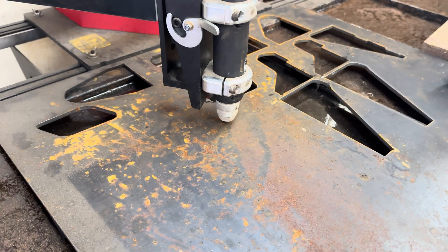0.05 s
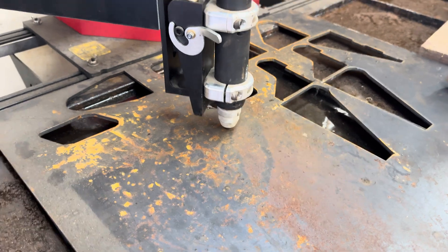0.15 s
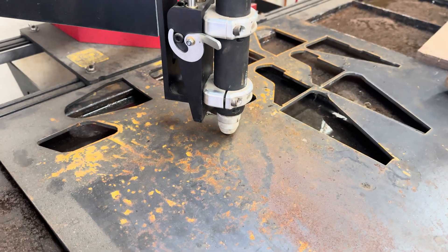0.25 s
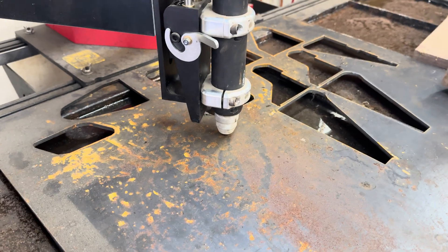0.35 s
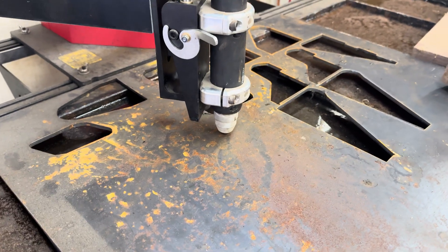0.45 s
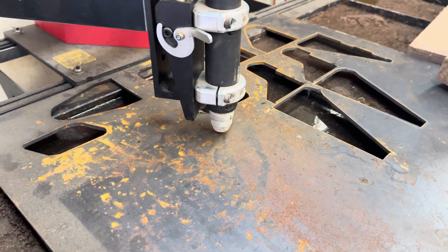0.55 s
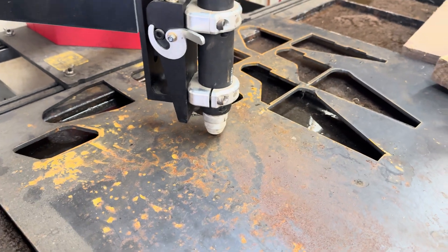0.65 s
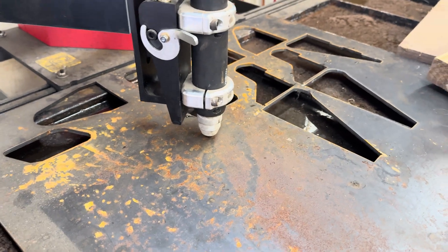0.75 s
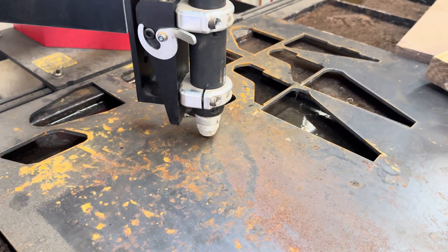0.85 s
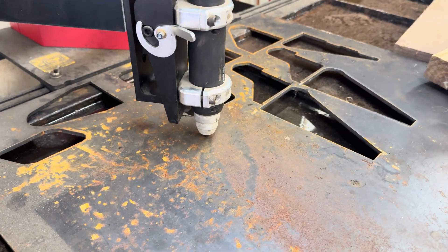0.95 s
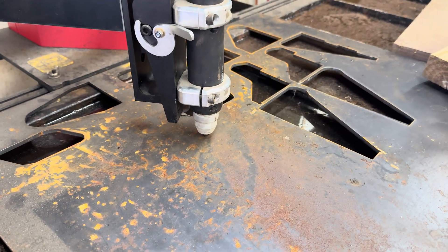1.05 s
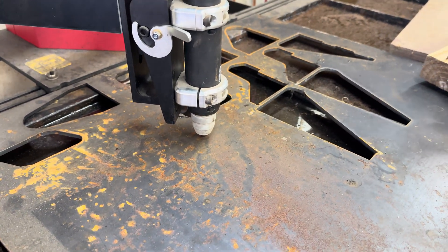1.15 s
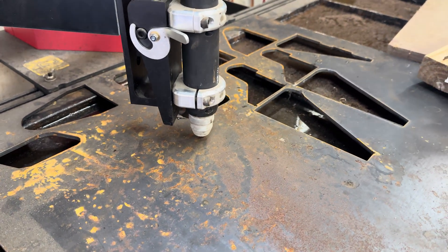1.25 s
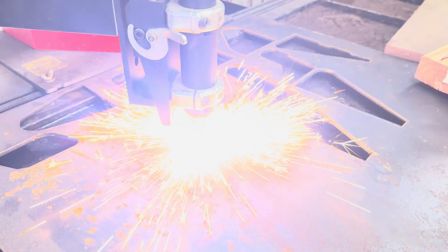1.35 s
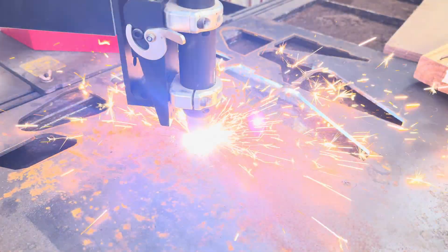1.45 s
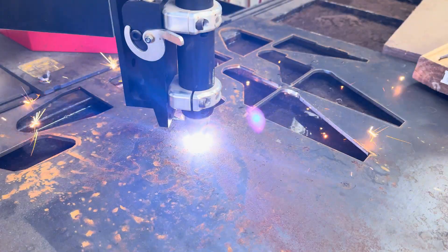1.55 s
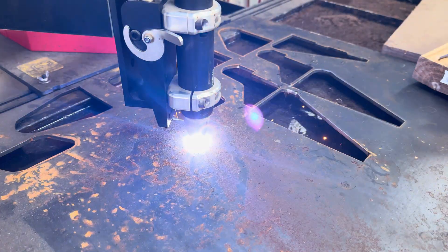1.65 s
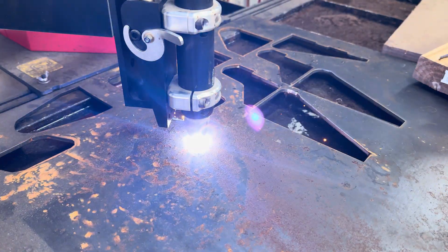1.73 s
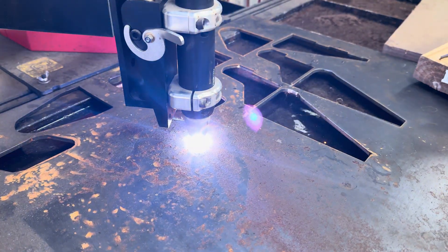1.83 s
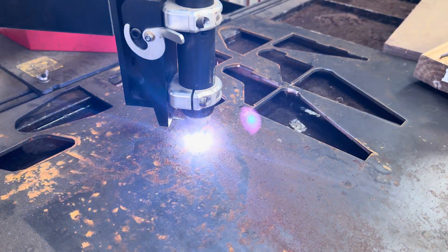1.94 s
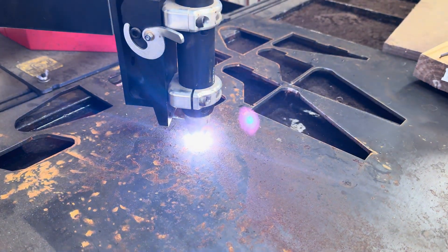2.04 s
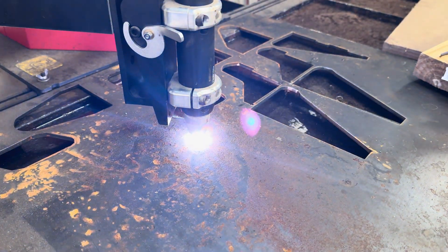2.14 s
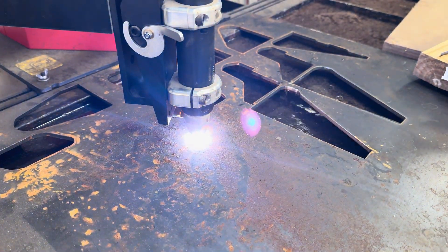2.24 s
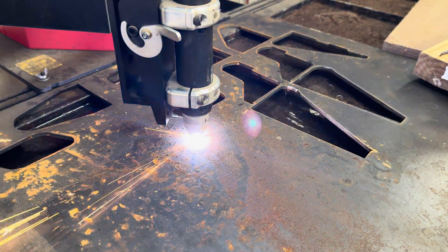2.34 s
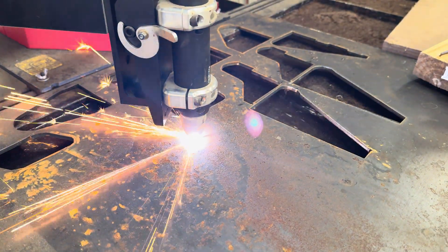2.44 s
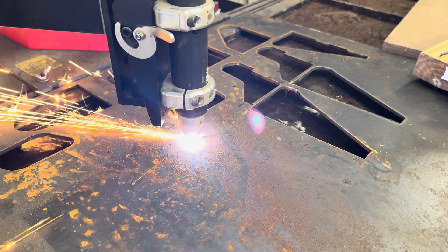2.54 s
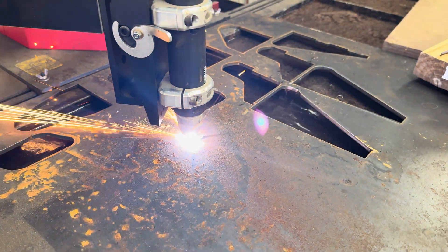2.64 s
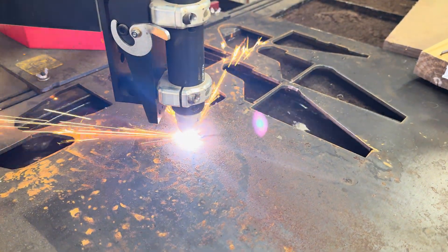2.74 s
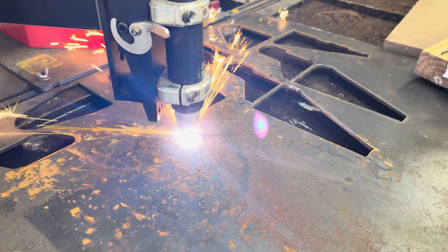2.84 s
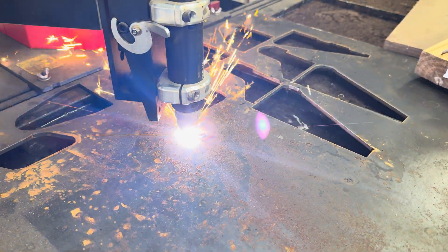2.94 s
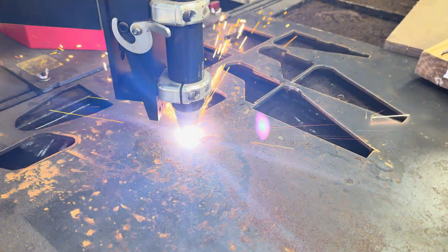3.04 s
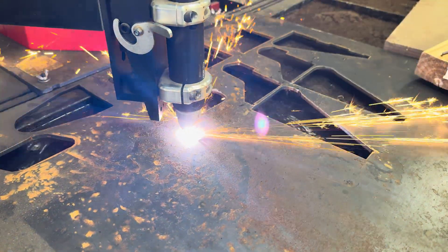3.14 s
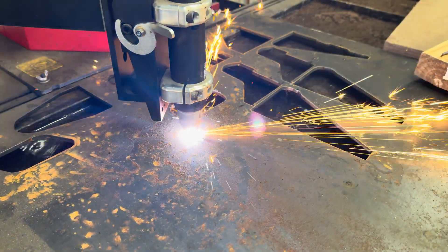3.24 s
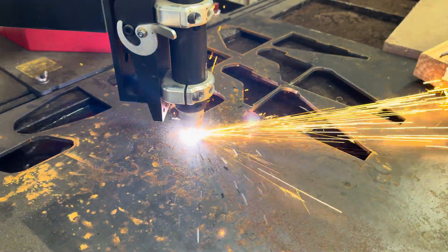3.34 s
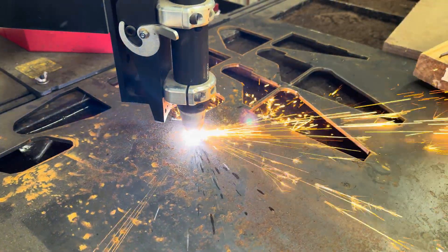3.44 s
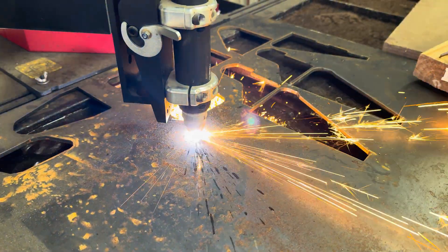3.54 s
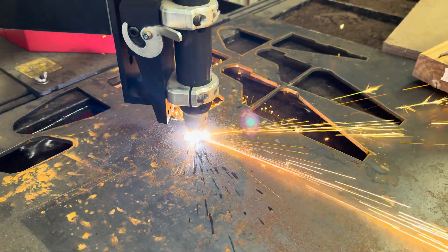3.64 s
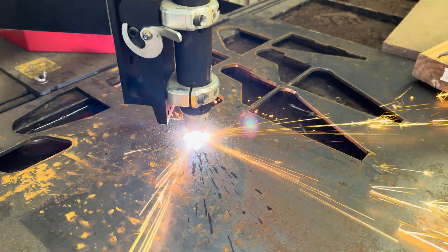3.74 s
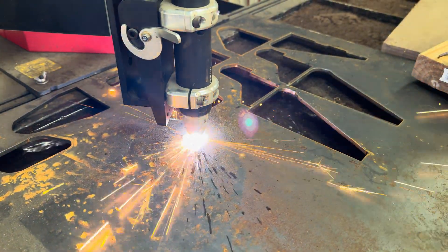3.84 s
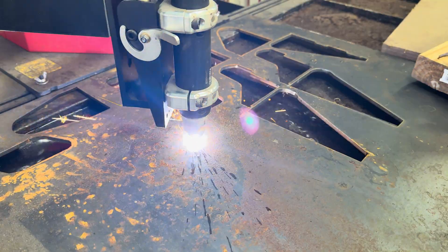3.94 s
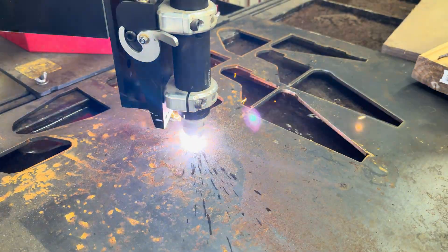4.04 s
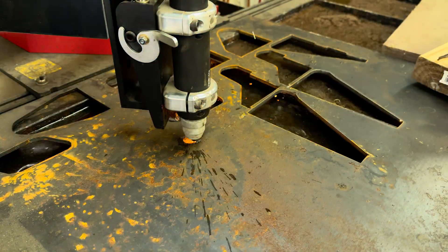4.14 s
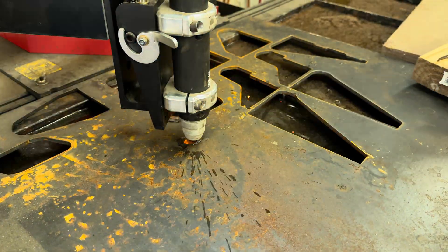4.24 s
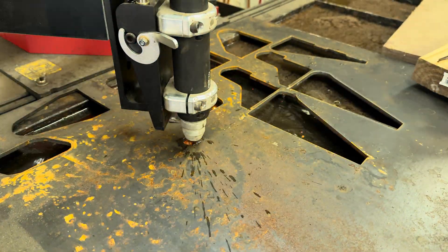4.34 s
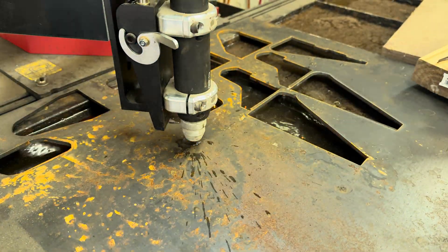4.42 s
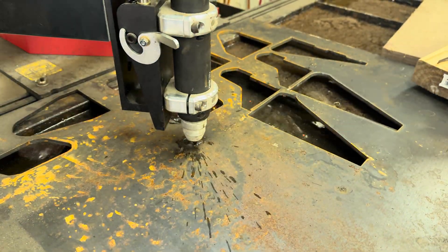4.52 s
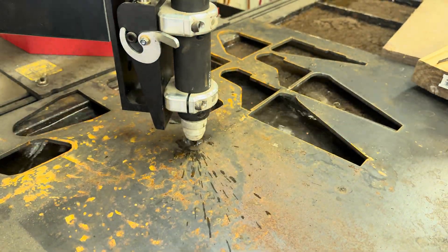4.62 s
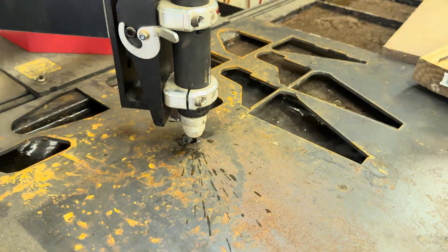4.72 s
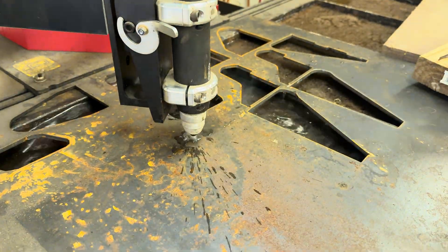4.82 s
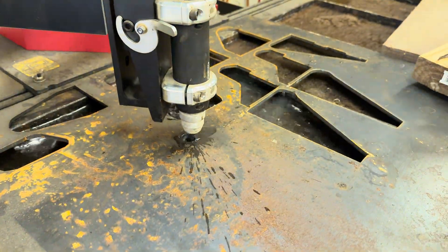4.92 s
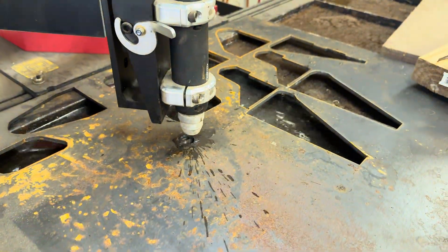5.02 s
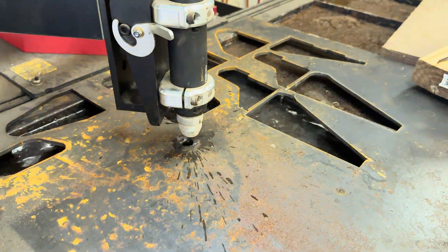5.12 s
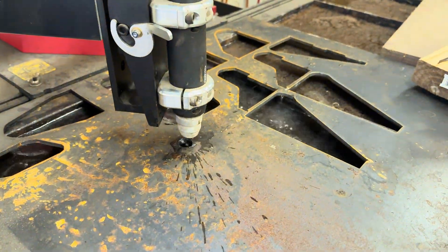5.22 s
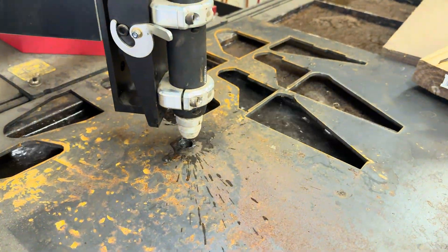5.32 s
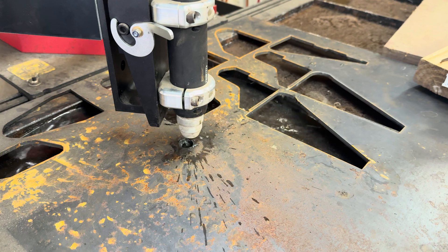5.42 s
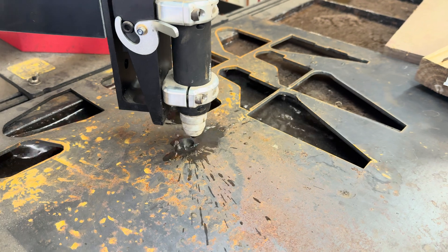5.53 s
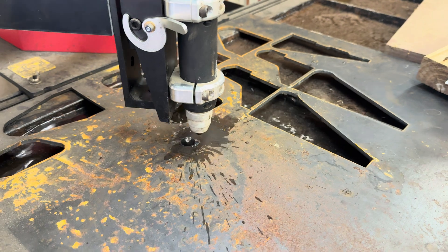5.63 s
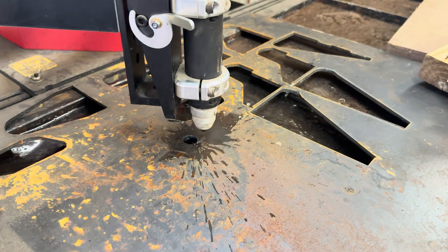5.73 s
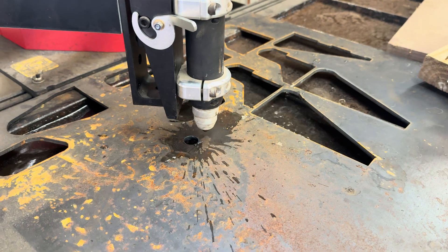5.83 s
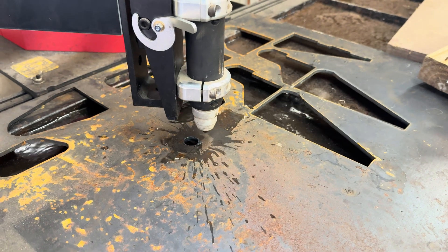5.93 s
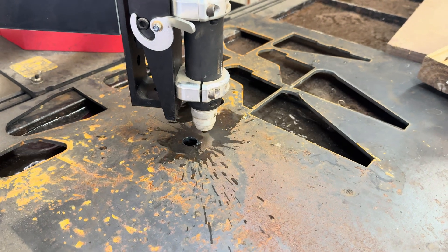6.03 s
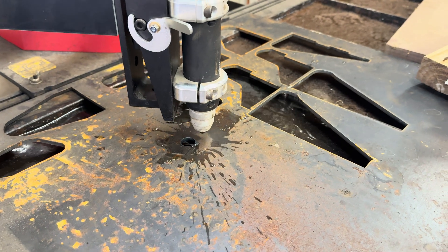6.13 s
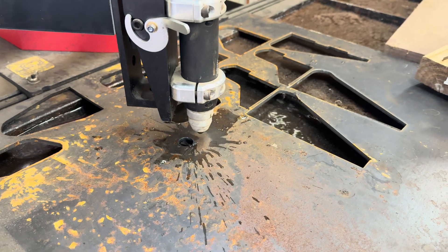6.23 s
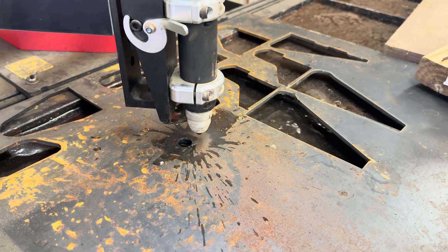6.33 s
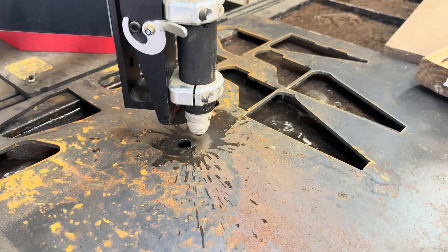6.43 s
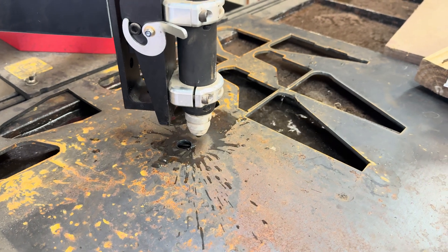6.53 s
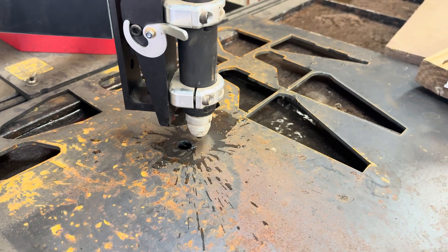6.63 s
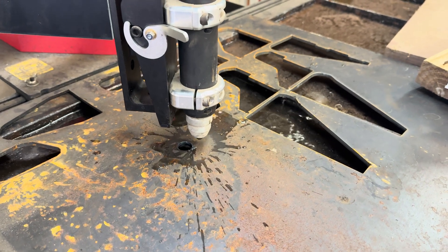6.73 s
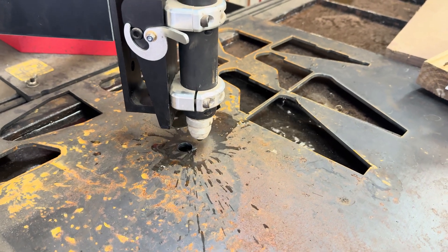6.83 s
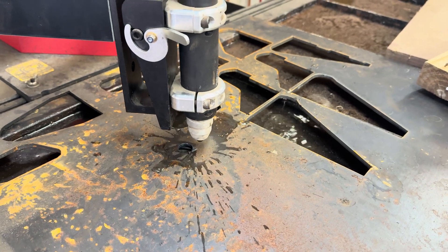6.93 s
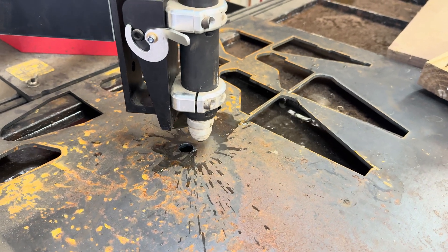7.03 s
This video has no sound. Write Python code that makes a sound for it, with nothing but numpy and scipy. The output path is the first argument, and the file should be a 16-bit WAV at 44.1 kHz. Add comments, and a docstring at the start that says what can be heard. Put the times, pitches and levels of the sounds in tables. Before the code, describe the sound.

Close to a cutting table, fans and a compressor hum beneath a faint leak and a bright click. Air whistles briefly before an arc bursts into loud, throbbing gas roar, splattering and sizzling in irregular pulses for almost three seconds. A hard snap stops it. High nozzle hiss remains, with hollow breathy singing over the hole and watery plops, then eases to a gentler hiss.

```python
"""Workshop hum, a few valve clicks, a rush of air, then a throbbing roar that snaps off with a pop into hiss.
A plasma torch pierces a steel plate on a water table: coloured noise in five gas regions, lifted by gushes.
Clicks and snap are decaying noise bursts; pops, slugs and bubbles gliding sines; spatter filtered impulses.
After the arc, cooling air churns the water; hole and cut slots sing as narrow-band noise."""
import sys
import numpy as np
from scipy import signal
from scipy.fft import rfft, irfft, next_fast_len
from scipy.io import wavfile
from scipy.ndimage import map_coordinates

SR = 44100
rng = np.random.default_rng(int(sys.argv[2]) if len(sys.argv) > 2 else 0)


def file_out(sig):
    """Save sig as 16-bit WAV at sys.argv[1]."""
    # one column per channel
    cols = np.atleast_2d(sig).T
    # limit, then scale
    lim = np.clip(cols, -1, 1)
    pcm = np.round(lim * 32767).astype(np.int16)
    wavfile.write(sys.argv[1], SR, pcm)


N = 311787
HZ = np.maximum(np.fft.rfftfreq(next_fast_len(N), 1 / SR), 1)   # FFT bins, DC moved to 1 Hz for the log
# air flows, arc strikes, arc breaks, air pressure eases
AIR_ON_S, STRIKE_S, BREAK_S, EASE_S = 1.314, 1.382, 4.135, 5.6


def amp(db):
    """dB to amplitude factor."""
    return 10 ** (np.asarray(db) / 20)


def rms_one(x):
    """Scale to unit rms over all channels."""
    return x / np.sqrt(np.mean(x ** 2) + 1e-20)


def in_time(rows):
    """Interpolate each column after t/s to every sample."""
    s, *columns = np.transpose(rows)
    return [np.interp(np.arange(N) / SR, s, c) for c in columns]


def at_hz(points):
    """Interpolate (f/Hz, value) to the FFT bins over log frequency."""
    hz, values = np.array(points).T
    return np.interp(np.log(HZ), np.log(hz), values)


def peak(hz, width_hz):
    """Resonance curve over the FFT bins, 1 at its centre and half at +-width/2."""
    return 1 / (1 + (2 * (HZ - hz) / width_hz) ** 2)


def noise(gain):
    """Two unrelated Gaussian noises shaped by gain per frequency; joint rms 1."""
    real, imaginary = rng.standard_normal((2, 2, len(HZ)), dtype=np.float32)
    spectrum = (real + 1j * imaginary) * np.float32(gain)
    return rms_one(irfft(spectrum, next_fast_len(N))[:, :N])


def drift(rate_hz):
    """Slow random wander of rms 1: two-pole low-passed noise at every 32nd sample."""
    r = np.exp(-64 * np.pi * rate_hz / SR)
    draws = rng.standard_normal(N // 32 + 2002)
    slow = signal.lfilter([1], [1, -2 * r, r * r], draws)[2000:]   # drop the settling
    return np.interp(np.arange(N) / 32, np.arange(len(slow)), rms_one(slow))


def since(s):
    """Seconds elapsed since s, 0 before it."""
    return np.maximum(np.arange(N) / SR - s, 0)


def decay(age_s, t60_s, rise_s):
    """Exponential rise times a 60 dB fall per t60."""
    return (1 - np.exp(-age_s / rise_s)) * amp(-60 * age_s / t60_s)


def glide(s, db, hz, t60_s, rise_s=0.0013, slide=1):
    """Dying sine whose pitch slides by a factor over one t60."""
    out, start = np.zeros(N), round(s * SR)
    age_s = np.arange(min(round(1.5 * t60_s * SR), N - start)) / SR
    pitch_hz = hz * slide ** np.minimum(age_s / t60_s, 1)
    sine = np.sin(2 * np.pi * np.cumsum(pitch_hz) / SR)
    out[start:start + len(age_s)] = amp(db) * decay(age_s, t60_s, rise_s) * sine
    return out


def hum():
    """Fan and compressor hum: broad rush, narrow casing resonances and wavering motor tones."""
    # hum level, before a common offset: t/s, level/dB
    hum_level = [(0.0, -33.5), (1.38, -33.5), (1.61, -41.5), (2.32, -49.5), (3.19, -47), (4.15, -51),
                 (4.45, -58), (5.44, -55), (7.07, -53)]
    # rush spectrum: f/Hz, relative level/dB
    rush_colour = [(18, -63), (30, -22), (65, -13), (97, -19), (130, -12.5), (160, -4), (304, -11.5),
                   (470, -20), (624, -16), (674, -20), (917, -17), (1040, -22.5), (1460, -19.5),
                   (2990, -37.5), (9280, -47), (11100, -50), (14000, -56)]
    # casing resonances: f/Hz, width/Hz, relative level/dB
    casing_tones = [(163, 20, -13), (192.3, 5.4, -12.5), (213.3, 9.2, -12), (274, 8.1, -15),
                    (307.8, 14, -12.5), (364, 8.7, -16.5), (420, 20, -19.5), (506, 20, -26.5),
                    (560, 10, -29), (800, 22, -27), (615, 34, -15.5), (907, 24, -22), (1310, 13, -21)]
    # motor tones: f/Hz, mean level against the hum/dB
    motor_lines = [(165, -14), (274.3, -15), (303, -17)]
    # diffuse sound from all round, second channel over first: f/Hz, level/dB
    spread = [(60, -3), (200, 4), (380, 11.5), (700, -1), (1300, 1.5), (3000, 4)]
    waver_db, waver_rate_hz = 2.5, 2.8
    rush_power = amp(at_hz(rush_colour)) ** 2
    tone_power = sum(amp(db + 11.5) ** 2 * peak(hz, width) ** 2 for hz, width, db in casing_tones)
    motors = np.zeros(N)
    for hz, db in motor_lines:
        motors += amp(db + waver_db * drift(waver_rate_hz)) * np.sin(2 * np.pi * hz * since(0))
    fans = noise(np.sqrt(rush_power + tone_power) * amp(at_hz(spread) * [[0], [1]]))
    level_db = in_time(hum_level)[0] + 5.5 + 0.29 * drift(1.2)
    return amp(level_db) * (fans + motors)


def clicks_and_leak():
    """Short ringing noise bursts: valve clicks, and the snap as the arc breaks; a distant leak dies away."""
    # valve clicks, last row the arc's snap: t/s, level/dB, t60/s
    click_rows = [(0.3077, -41, 0.019), (0.4163, -25, 0.024), (.432, -37, .025), (0.6944, -52, 0.026),
                  (1.2805, -44, 0.33), (4.1315, -17, 0.01)]
    # resonances of the bursts, as of a valve body: f/Hz, width/Hz, lift/dB
    burst_ring = [(1400, 300, 10), (4060, 180, 10), (5200, 170, 8), (6900, 320, 11), (10300, 670, 5),
                  (12000, 3500, 6)]
    # distant air leak: t/s, level/dB
    leak_level = [(0, -50), (.06, -38), (.14, -39), (.22, -51), (.4, -58), (.5, -100)]
    ring_db = sum(db * peak(hz, width) for hz, width, db in burst_ring)
    ringing_noise = noise(amp(ring_db) * HZ / (HZ + 2000))
    bursts = np.zeros(N)
    for s, db, t60_s in click_rows:
        start = round(s * SR)
        age_s = np.arange(min(SR, N - start)) / SR
        tail = 0.24 * decay(age_s, 6.9 * t60_s, 0.0019)
        bursts[start:start + len(age_s)] += amp(db) * (decay(age_s, t60_s, 0.00068) + tail)
    leak_colour_db = at_hz([(800, 5.0), (2000, 1.0), (9000, -13.5), (15000, -17)])
    return ringing_noise * bursts + amp(in_time(leak_level)[0]) * noise(amp(leak_colour_db))


def valve_pings():
    """The plunger seats: brief steady-pitch dying sines."""
    # pings: t/s, level/dB, f/Hz, t60/s
    ping_rows = [(.4192, -24, 4100, .03), (0.4205, -30, 5350, .025)]
    return sum(glide(*row, slide=1) for row in ping_rows) * [[1], [.5]]


def gas_levels():
    """Level/dB of each gas region: air alone, arc, cooling air, eased air; gushes and sloshes on top."""
    # Lists hold one value per region: deep roar, hollow roar, splatter, sizzle, nozzle hiss.
    # air alone: start level/dB; slope/(dB/s) as the first rush settles
    preflow_db = [-43, -28, -31.5, -34.5, -29]
    preflow_slope = [0.1, -150, -150, -3, 0.1]
    # arc between gushes: level/dB at strike (deep roar: added to deep_level); slope/(dB/s)
    arc_db = [-0.13, -33, -38.5, -36, -24.5]
    arc_slope = [-0.2, -2, -5.5, -3, -0.28]
    # deep roar swells while piercing, fades once through, returns at the end: t/s, level/dB
    deep_level = [(1.4, -32.5), (1.6, -33.5), (2.1, -27.5), (2.45, -28), (2.9, -39.5), (3.6, -51.5),
                  (4.12, -30)]
    # fall/s as the arc breaks: low sound lingers in the workshop
    break_fall_s = [0.089, 0.14, 0.038, .012, 0.005]
    # cooling air: level/dB at the break; slope/(dB/s) until the pressure eases
    after_db = [-50.5, -44.5, -50.5, -45, -33.5]
    after_slope = [-2, 0.5, 4.5, 3.0, 0.94]
    # eased air: step/dB; time of step/s; slope/(dB/s)
    ease_drop_db = [-6, -4, -6.5, -6.5, -6.5]
    ease_fall_s = [0.18, 0.1, 0.11, 0.06, 0.08]
    calm_slope = [3.6, 0.72, 0.3, 2.1, 3.2]
    # gas and molten metal gushing out of the hole: peak t/s, length/s, lift of each region/dB (5)
    gush_rows = [(1.386, 0.023, -13, -2, 9, 2.5, 9.5), (1.42, 0.045, -11, 5.5, 10, 12, 8.5),
                 (1.461, 0.043, -4, 3.5, 10.5, 10.5, 11), (1.504, 0.046, 4.5, 10, 23, 13.5, 10),
                 (1.547, 0.035, 10, 7.5, 22, 17, 7.5), (1.587, 0.042, 17, 16.5, 16.5, 8.5, 8),
                 (1.652, 0.034, 3, 4.5, 4.6, 7.5, 6), (1.698, 0.069, 12.5, 13, 8.1, 8, 6.5),
                 (1.789, 0.056, 15, 12.5, 12.5, 5, 1), (1.869, 0.055, 12.5, 16, 12, 11, 5),
                 (1.911, 0.036, 7, 8.5, 6.4, 10, 6), (1.946, 0.019, 11.5, 5, 5.1, 5, 4.5),
                 (1.997, 0.062, 14.5, 13.5, 16.2, 14.5, 4), (2.059, 0.037, 5.5, 14.5, 7.2, 5.5, 2),
                 (2.108, 0.086, 7, 9, 9.9, 5, 2.5), (2.165, .04, -1, 3, 4.9, 1, -1.5),
                 (2.201, 0.039, 8, 8.5, 15.5, 6, -0.5), (2.251, 0.067, 12, 12, 14, -0.5, -1),
                 (2.315, 0.053, 12.5, 10, 11, 6, -1.5), (2.268, 0.042, 0, 3.5, 6.2, 10, 4.5),
                 (2.396, 0.074, 10, 13.5, 19, 8, 3), (2.486, 0.058, 8, 10.5, 15, 11.5, 8),
                 (2.536, 0.049, 5.5, 13, 17.6, 7.5, 6), (2.621, 0.066, 4.5, 3, 14, 11, 4),
                 (2.672, 0.045, 2, 11, 7.9, 3, 0), (2.738, 0.12, 5, 9.5, 7.8, 6.5, 2),
                 (2.811, 0.041, 8.5, 7.5, 9, 5, 0), (2.851, 0.054, 5, 13.5, 21.6, 5.5, 2),
                 (2.891, 0.032, 10, 7.5, 3.6, 3, 2.5), (2.959, 0.052, 1, 7.5, 13.7, 8, 1.5),
                 (3.018, 0.071, 14, 14.5, 20.8, 7.5, -0.5), (3.096, 0.085, 9, 12.5, 19.3, 5.5, 1),
                 (3.165, 0.038, 4, 6, 3, 4, 0), (3.212, 0.059, 7, 10.5, 16.5, 8, 1),
                 (3.304, 0.14, 16, 12, 13, 7.5, -2), (3.408, 0.053, -2, 10.5, 15.7, 7.5, -1.5),
                 (3.485, 0.095, 11, 15, 24.3, 11, 1.5), (3.554, 0.048, -12, 3, 14, 8.5, 1),
                 (3.642, 0.12, 5, 13, 28.2, 12, 0), (3.778, 0.12, 7.5, 9, 21.3, 12, 1.5),
                 (3.863, 0.058, 4.5, 2.5, 5.3, 4, 0), (3.928, 0.087, 4, 11.5, 20.5, -1, 0),
                 (3.979, 0.1, 4, 7, 7, 2, -1.5), (4.044, 0.12, -5, 8.5, 24.4, 9, 5),
                 (4.132, 0.041, 7.5, 11, 13.5, 0, 5)]
    # water slapped by the cooling air: peak t/s, length/s, lift of each region/dB (5)
    slosh_rows = [(4.238, 0.038, 1.3, 4.1, 5, 1.9, .6), (4.32, 0.054, 0.56, 2.7, 7.9, 1.3, 0.89),
                  (4.41, 0.025, 7.3, 1.5, 0.77, .6, 0.41), (4.512, 0.076, 3.1, 4.5, 4.3, 0.58, 0.37),
                  (4.65, 0.072, 4.6, 3.9, 4.7, 2, .6), (4.86, 0.019, 2.5, 5.1, 4.8, 1.1, 0.72),
                  (4.905, 0.017, 3.7, 1.8, 1.1, 1.6, 2), (5.17, 0.095, 2.2, 3.9, 2.5, 2.1, 0.45),
                  (5.54, 0.065, 2.6, 2.5, 1.4, 1.3, 0.53)]
    strike_rise_s = 0.0021
    edge = 2.74   # 2 = round swell, higher = flat top with steep sides

    def column(v):
        return np.reshape(v, (-1, 1))

    t = np.arange(0, N, 32) / SR
    s, length_s, *lifts_db = np.transpose(gush_rows + slosh_rows)
    swell = 2.0 ** -np.abs(2 * (t - column(s)) / column(length_s)) ** edge   # half height over its length
    surge_db = np.array(lifts_db) @ swell
    before = column(preflow_db) + column(preflow_slope) * (t - AIR_ON_S)
    before = np.minimum(before, column(preflow_db))
    arc = column(arc_db) + column(arc_slope) * (t - STRIKE_S)
    arc[0] += np.interp(t, *np.transpose(deep_level))
    calm_s = np.maximum(t - EASE_S, 0)
    after = column(after_db) + column(after_slope) * (t - BREAK_S - calm_s)
    after = after + column(ease_drop_db) * np.minimum(calm_s / column(ease_fall_s), 1)
    after = after + column(calm_slope) * calm_s
    struck = np.clip((t - STRIKE_S) / strike_rise_s, 0, 1)
    broken = np.clip((t - BREAK_S) / column(break_fall_s), 0, 1)
    levels = (1 - struck) * before + (struck - broken) * arc + broken * after + struck * surge_db
    return [np.interp(np.arange(N) / SR, t, db) for db in levels]


def patchy(colour, patch_db, blob_hz, blob_s):
    """Noise rung through the plate; eddies make short time-frequency blobs swell and sink."""
    # plate and table resonances: f/Hz, width/Hz, lift/dB
    plate_modes = [(365, 21, 1), (533, 35, 7), (648.6, 43, 8.5), (887, 42, 6), (1087, 43, 5.5),
                   (1320, 17, 4.5), (2000, 8.7, 9.5), (2427, 29, 6.5), (2980, 20, 11.5), (4070, 6.9, 9),
                   (4360, 17, 8), (5180, 28, -30), (9000, 130, -1), (9800, 31, -1)]
    plate_db = sum(db * peak(hz, width) for hz, width, db in plate_modes)
    gas = noise(amp(at_hz(colour) + plate_db))
    hz, s, cells = signal.stft(gas.astype(np.float32), SR, nperseg=512)
    coarse = rng.standard_normal((200, 800))
    large_grid = np.meshgrid(hz / blob_hz, s / blob_s, indexing="ij")
    small_grid = np.meshgrid(3 * hz / blob_hz, 2.5 * s / blob_s, indexing="ij")   # smaller, faster eddies
    blobs = map_coordinates(coarse, large_grid, order=1, mode="wrap")
    blobs = blobs + 0.96 * map_coordinates(coarse.T, small_grid, order=1, mode="wrap")
    depth_db = np.interp(s, np.arange(N) / SR, patch_db)
    cells = cells * amp(depth_db * np.clip(blobs, -3, 2))
    return rms_one(signal.istft(cells, SR, nperseg=512)[1][:, :N])


def torch(levels):
    """Turbulent gas in five regions; molten metal leaving the hole makes all flutter together."""
    # region spectra, before plate resonances: f/Hz, relative level/dB
    deep_colour = [(59, -59), (100, -26), (157, -9.5), (214, -8.5), (352, 4), (439, 0), (646, -0.5),
                   (709, -4), (900, -7.5), (1170, -28), (1980, -120)]
    hollow_colour = [(350, -27), (600, -42), (683, -22), (735, -2.5), (878, -0.5), (1230, -2.5), (1340, 2),
                     (1590, -10), (1900, -9), (2470, -37), (4180, -120)]
    splatter_colour = [(880, -51), (1500, 1.5), (1630, 3.5), (2120, 2), (2710, -6.5), (3300, -13.5),
                       (4290, -11), (7260, -120)]
    sizzle_colour = [(1820, -21), (3100, -1.5), (4180, 0.5), (4980, 1), (6360, 0), (7000, -8), (9100, -58),
                     (15400, -120)]
    nozzle_colour = [(5500, -24.5), (6500, 0), (7700, 1.5), (9000, 4.5), (10200, 4), (11300, 4.5),
                     (13000, 2.5), (14500, 5), (15300, 5), (16000, 1)]
    colours = (deep_colour, hollow_colour, splatter_colour, sizzle_colour, nozzle_colour)
    lit = np.clip(since(AIR_ON_S) / 0.0022, 0, 1)
    # arc, churning water, calm air
    unrest = np.interp(np.arange(N) / SR, [4.13, 4.15, 5.6, 5.8], [0.85, 0.75, 0.46, 0.33])
    flutter = unrest * np.clip(drift(57.0), -2, 2)
    # depths at unrest 1, per unit of flutter or blob
    shared_db, patch_db = [1.8, 1.84, 0.13, 0.95, 1.02], [2.2, 2.4, 5.2, 4.9, 2.7]
    blob_hz, blob_s = [156, 248, 404, 577, 1660], [0.03082, .03, .025, .022, 0.044]
    gas = np.zeros((2, N))
    for db, colour, shared, patch, hz, s in zip(levels, colours, shared_db, patch_db, blob_hz, blob_s):
        gas += amp(db + shared * flutter) * patchy(colour, patch * unrest, hz, s)
    return lit * gas


def whistle():
    """Short breathy whistle: the first air past the nozzle lip, as resonant noise."""
    centre_hz, width_hz, level_db, t60_s = 1650, 270, -23.5, 0.29
    return amp(level_db) * decay(since(AIR_ON_S), t60_s, 0.0037) * noise(peak(centre_hz, width_hz))


def spatter(level_db, per_s, low_hz, high_hz):
    """Droplets of molten steel burst as random clicks while the arc burns, following the gas level."""
    burning = (since(STRIKE_S) > 0) & (since(BREAK_S) == 0)
    sizes = amp(4.3 * np.minimum(rng.exponential(1, (2, N)), 3)) * rng.choice([-1, 1], (2, N))
    clicks = sizes * (rng.random(N) < per_s / SR)
    band = signal.butter(4, [low_hz, high_hz], "band", fs=SR, output="sos")
    return burning * amp(level_db) * rms_one(signal.sosfilt(band, clicks))


def arc_pops():
    """Arc strikes and breaks: the gas column collapses, so the pitch falls."""
    # pops: t/s, level/dB, start f/Hz, t60/s
    pop_rows = [(1.41, -11, 202, 0.041), (4.1312, -5, 1050, 0.02), (4.133, 2.5, 420, 0.0081),
                (4.135, -17, 258, 0.054)]
    pops = sum(glide(*row, slide=0.27) for row in pop_rows)
    high_pass = signal.butter(2, 75, "high", fs=SR, output="sos")   # the pops carry little deep bass
    return signal.sosfilt(high_pass, pops) * [[1], [.3]]


def molten_slugs():
    """Molten slugs blown from the hole, which rings: dying sines falling slightly in pitch."""
    # slugs: t/s, level/dB, start f/Hz, t60/s, rise/s
    slug_rows = [(1.482, -15, 1320, 0.13, .002), (1.52, -12, 2140, 0.043, .004),
                 (1.569, -5, 1123, 0.076, 0.0036), (1.585, -13, 720, 0.043, 0.0045),
                 (1.649, -14.5, 887, 0.19, .002), (1.682, -6.5, 1022, 0.069, 0.0017),
                 (1.781, -10.5, 362, 0.11, .002), (1.843, -8, 620, 0.033, .001),
                 (1.872, -7, 1350, .04, .003), (1.9, -2.5, 906, 0.073, 0.0053),
                 (1.938, -16, 528, 0.045, .002), (1.978, -6.5, 312, 0.045, 0.0025),
                 (1.989, -8, 1330, .04, .003), (2.008, 8.5, 690, 0.055, 0.011),
                 (2.045, -1, 685, 0.03, 0.00054), (2.06, -3, 900, .04, .002),
                 (2.163, -5, 384, 0.038, 0.0026), (2.244, -6, 930, 0.06, 0.0018),
                 (2.465, -12, 590, 0.049, 0.0022), (2.61, -5, 350, 0.027, 0.0023),
                 (2.664, -14, 664, 0.13, 0.0018), (2.802, -6, 777, 0.066, .001),
                 (2.851, -15, 1350, .05, 0.0043), (3.014, -8.5, 880, 0.045, .003),
                 (3.048, -10.5, 893, 0.05, 0.0018), (3.165, -12, 780, 0.043, 0.0022),
                 (3.198, -15, 1080, 0.039, .002), (3.284, -13.5, 915, 0.14, 0.0017),
                 (3.339, -15, 934, 0.073, 0.0018), (3.468, -15.5, 1143, 0.11, .002),
                 (3.503, -12, 1000, 0.061, .003), (3.607, -17, 850, 0.039, 0.0022),
                 (3.635, -9.5, 1176, 0.049, .003), (3.682, -9, 1314, .04, .003),
                 (3.747, -9, 940, 0.022, 0.0018), (3.762, -8, 920, 0.018, 0.0015),
                 (3.822, -16, 777, 0.15, 0.0025), (3.865, -8.5, 1020, 0.046, .002),
                 (3.882, -5, 895, 0.032, .002), (3.956, -12, 950, .05, .003),
                 (3.978, -13, 1102, 0.072, 0.0033), (4.052, -21, 2220, 0.043, .003),
                 (4.098, -10, 533, 0.036, .002)]
    return sum(glide(*row, slide=0.895) for row in slug_rows) * [[1], [.3]]


def kerf():
    """Jet singing in the deep cut: broad breathy resonant noise."""
    # tones: f/Hz, width/Hz, relative level/dB
    kerf_tones = [(2940, 120, -18), (4410, 320, 4.5), (6320, 1100, 5)]
    # mean level: t/s, level/dB
    kerf_level = [(3.3, -80), (3.45, -45), (3.7, -40), (3.8, -32.5), (4.0, -33.5), (4.13, -45),
                  (4.149, -90)]
    level_db = in_time([(3.2, -120)] + kerf_level + [(4.2, -120)])[0] + 2.8 * drift(15.0)
    return amp(level_db) * noise(sum(amp(db) * peak(hz, width) for hz, width, db in kerf_tones))


def hole():
    """Air over the open hole sings like a bottle, broadly; pitch climbs as the gap widens."""
    # air blowing over the hole: t/s, level/dB
    lift_level = [(4.2, -52), (4.45, -56), (4.53, -44), (4.62, -46), (4.78, -51), (4.87, -46), (4.95, -55),
                  (5.1, -39), (5.3, -40), (5.499, -38), (5.56, -34), (5.63, -43), (5.72, -46), (5.8, -67),
                  (5.901, -90)]
    torch_rise_s = 5.05
    rise_per_s, ease_per_s = 0.26, 1   # pitch climb as the torch rises; extra once the pressure eases
    song = noise(peak(780, 91) + 1.0 * peak(985, 81) + 0.32 * peak(1200, 150))
    climb = rise_per_s * np.minimum(since(torch_rise_s), .7) + ease_per_s * np.minimum(since(EASE_S), .3)
    read = np.cumsum(1 + climb) % (N - 1)   # reading faster raises the pitch
    song = np.array([np.interp(read, np.arange(N), v) for v in song])
    return amp(in_time([(4.13, -120)] + lift_level + [(6.0, -120)])[0]) * song


def water_bubbles():
    """Bubbles in the water: dying sines whose pitch climbs as each rises."""
    # bubbles: t/s, level/dB, start f/Hz, t60/s
    bubble_rows = [(4.28, -30, 1900, .04), (4.2, -24, 1560, 0.0486), (4.5, -32, 2100, 0.11),
                   (4.225, -32, 1000, 0.071), (4.405, -30, 770, .05), (4.505, -33, 2350, .05),
                   (4.51, -32, 770, .08), (4.632, -29, 1600, .05), (4.835, -36, 2700, 0.049),
                   (4.641, -23, 1300, 0.054), (4.659, -25, 1460, 0.05), (4.85, -41, 1130, 0.083),
                   (4.901, -32, 415, 0.058), (5.527, -33, 960, 0.055)]
    return sum(glide(*row, slide=1.2) for row in bubble_rows) * [[1], [.5]]


def slots():
    """Eased air humming in the cut slots: broad steady resonant noise."""
    # tones: f/Hz, width/Hz, relative level/dB
    slot_tones = [(895, 74, 4), (1155, 57, -7), (1360, 60, -12), (1460, 50, -3), (1660, 25, -10)]
    level_db, rise_s = -54.5, 0.17
    fade = np.minimum(since(EASE_S) / rise_s, 1)
    return amp(level_db) * fade * noise(sum(amp(db) * peak(hz, width) for hz, width, db in slot_tones))


def scene():
    """Sum of all sources in two channels, shared and apart, from which left and right are blended."""
    levels = gas_levels()
    out = hum() + clicks_and_leak() + valve_pings()
    out = out + torch(levels) + whistle()
    out = out + spatter(levels[3] - 11.0, 450, 2000, 13000)   # fine droplets, against the sizzle
    out = out + spatter(levels[1] - 7.5, 400, 280, 1440)   # blunt bursts of melt, against the hollow roar
    out = out + arc_pops() + molten_slugs() + kerf()
    return out + hole() + water_bubbles() + slots()


def record(dry):
    """Stereo image: left-right likeness, level and phase by frequency; then clipping and band limits."""
    # left-right likeness: f/Hz, correlation
    likeness = [(60, .98), (130, .96), (330, .975), (600, .82), (1200, .62), (1800, .5), (2700, .5),
                (4200, .42), (6500, .3), (8000, .5), (8800, .995), (16000, .998)]
    # left over right: f/Hz, level/dB
    tilt = [(60, 0), (130, -1.5), (330, 0), (700, -3.5), (1300, -3), (2400, -1.5), (4400, .5), (8000, 0),
            (15000, 0)]
    # phase between left and right, stepped in the treble: f/Hz, phase/rad
    phase = [(0, 0), (350, .1), (650, .9), (950, 1.0), (1380, 1.3), (1800, 2.6), (2250, 6.3), (4570, 6.4),
             (6400, 5.2), (7580, 3.9), (8960, -.1), (9650, 0), (10600, -3.0), (11600, -3.3), (12300, -6.2),
             (13400, -6.4), (14300, -9.3), (15000, -9.5), (15500, -12.4)]
    shared, apart = rfft(dry, next_fast_len(N))
    alike = np.clip(at_hz(likeness), 0, 1)
    # half the phase and tilt on each side
    turn = np.exp(.5j * np.interp(HZ, *np.transpose(phase))) * amp(at_hz(tilt) / 2)
    left = (np.sqrt(1 + alike) * shared + np.sqrt(1 - alike) * apart) * turn
    right = (np.sqrt(1 + alike) * shared - np.sqrt(1 - alike) * apart) / turn
    pair = irfft(np.array([left, right]), next_fast_len(N))[:, :N]
    pair = np.clip(amp(-2.5) * pair, -1, 1)
    bass_cut = signal.butter(3, 52, "high", fs=SR, output="sos")
    top_cut = signal.cheby2(24, 75, 16000, fs=SR, output="sos")   # 75 dB down from 16 kHz
    return signal.sosfilt(top_cut, signal.sosfilt(bass_cut, pair))


dry = scene()
out = record(dry)
file_out(out)
```